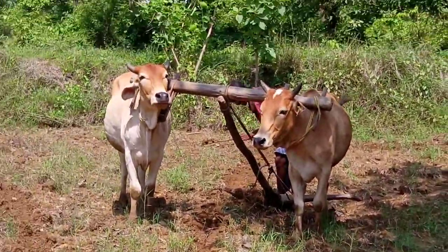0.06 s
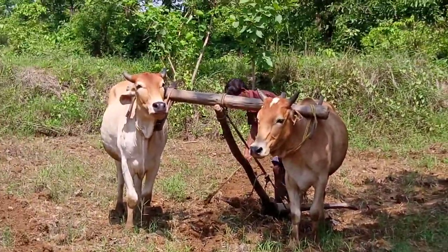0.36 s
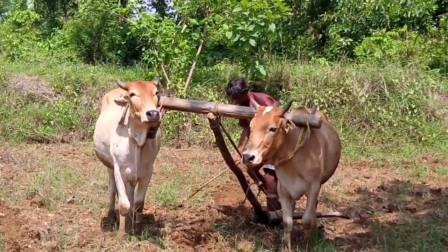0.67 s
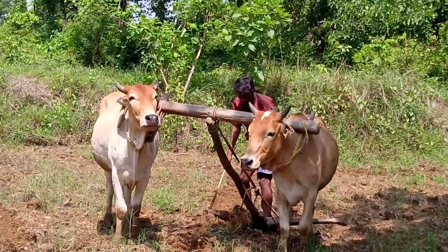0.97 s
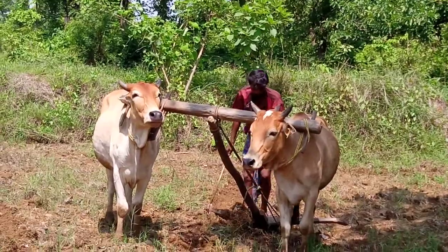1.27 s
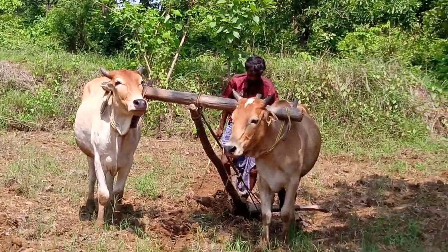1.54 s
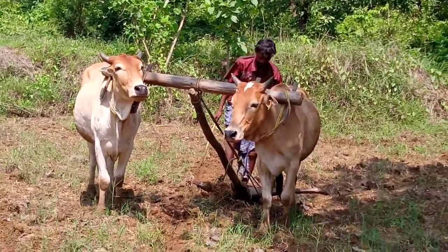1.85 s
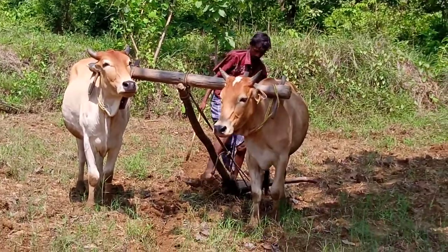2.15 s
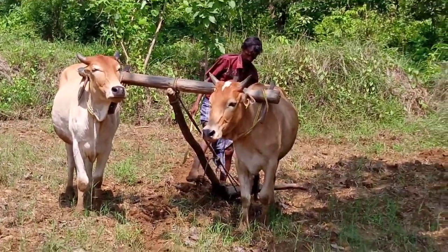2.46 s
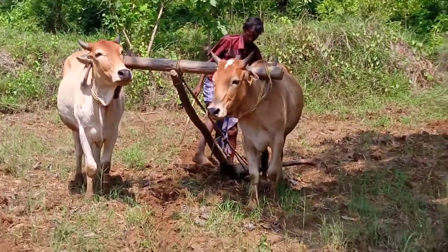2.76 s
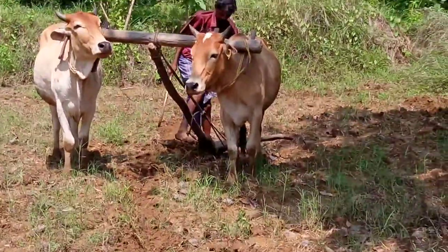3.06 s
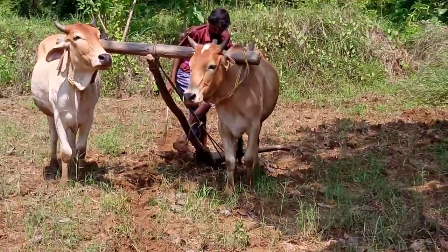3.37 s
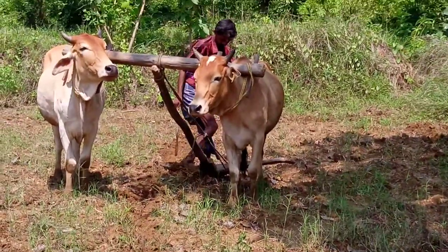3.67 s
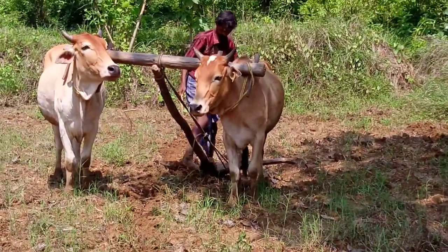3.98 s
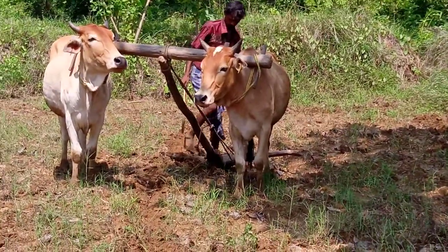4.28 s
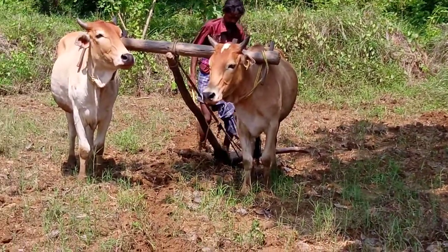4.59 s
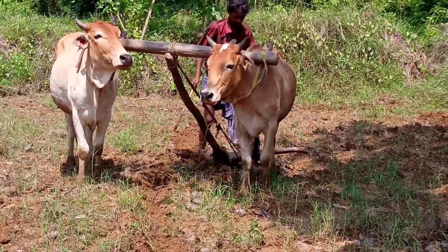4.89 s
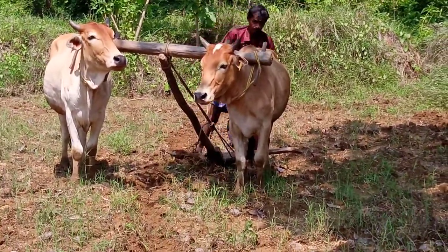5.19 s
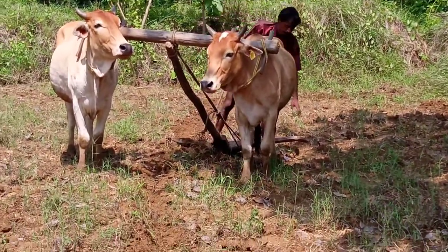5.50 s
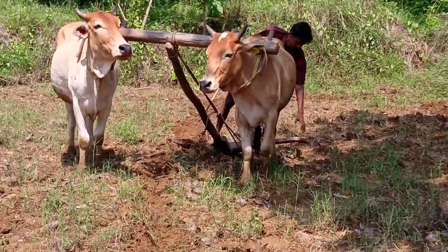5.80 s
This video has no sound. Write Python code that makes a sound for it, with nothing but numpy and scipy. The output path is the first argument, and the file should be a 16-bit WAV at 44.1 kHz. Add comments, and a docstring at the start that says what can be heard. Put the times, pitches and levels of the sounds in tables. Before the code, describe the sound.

A wooden stick cracks sharply once in an open field. Soft hoof thuds on loose soil and light knocks from a wooden plough follow, over a high insect drone and a steadily chirping cricket that grow louder. A small bird gives high calls in pairs. Near the end the stick cracks twice more, followed by dull thuds. Light wind rumbles on the microphone in puffs.

```python
"""A dry field, where two oxen stand at a wooden plough while a stick cracks three times.
Each blow excites the damped modes of the wood; hooves, clods and the yoke add soft thuds and knocks.
Turbulent air rumbles on the microphone and a pump engine hums far away. Insects merge into a drone,
crickets chirp by stridulation, and a small bird calls in pairs of swept tones, with fainter birds beyond.
The bushes scatter the knocks, chirps and calls into short reverberation."""
import sys
import numpy as np
from scipy import signal
from scipy.fft import rfft, irfft
from scipy.io import wavfile
from scipy.ndimage import uniform_filter1d

SR = 44100
rng = np.random.default_rng(int(sys.argv[2]) if len(sys.argv) > 2 else 0)


def persist_wave(psi):
    """Save psi, clipped to +-1, as 16-bit WAV."""
    counts = np.round(np.clip(psi, -1, 1) * 32767).astype(np.int16)
    wavfile.write(sys.argv[1], SR, np.atleast_2d(counts).T)


N = 266364
TIME = np.arange(N) / SR


def amp(db):
    """Amplitude ratio of a level in decibels."""
    return 10 ** (np.asarray(db) / 20)


def unit(x):
    """Normalisation to an rms of one."""
    return x / np.sqrt(np.mean(x ** 2) + 1e-20)


def at_frequency(points, hz):
    """Interpolation of a table on a log-frequency axis."""
    f, value = np.transpose(points)
    return np.interp(np.log(hz + 1), np.log(f + 1), value)


def at_time(points, s=TIME):
    """Linear interpolation of a table in time."""
    return np.interp(s, *np.transpose(points))


def add(mix, s, sound):
    """Superposition of a sound on the mix, from time s."""
    start = round(s * SR)
    part = mix[max(start, 0):][:len(sound) + min(start, 0)]
    part += sound[max(-start, 0):][:len(part)]


def fade(t, t60):
    """Exponential decay, by 60 dB in t60 seconds."""
    return np.exp(-np.log(1000) * t / t60)


def ring(t, hz, t60):
    """Free vibration of one damped mode."""
    return np.sin(2 * np.pi * hz * t) * fade(t, t60)


def noise(spectrum, size=N):
    """Spectral shaping of white noise, at unit rms."""
    gain = amp(at_frequency(spectrum, np.fft.rfftfreq(size, 1 / SR)))
    return unit(irfft(rfft(rng.standard_normal(size)) * gain, size))


def wander(hz):
    """Random fluctuation of unit rms, band-limited to about hz."""
    gain = np.exp(-(np.fft.rfftfreq(N, 1 / SR) / hz) ** 2)
    return unit(irfft(rfft(rng.standard_normal(N)) * gain, N))


# Spectrum of the open air: (frequency [Hz], level [dB])
AIR_SPECTRUM = [(20, -18), (70, 17), (160, -2.5), (300, -1), (500, 0.5), (1000, -3), (2000, -4.5),
                (3300, -4), (4400, -9.5), (8000, -19.5), (10000, -19), (15500, -19)]

def open_air():
    """Ambient noise: a broadband floor whose level drifts slightly."""
    return amp(-66 + .5 * wander(3.5)) * noise(AIR_SPECTRUM)


# Engine harmonics: (order [1], rms level [dB])
PUMP_ORDERS = [(2, -62), (3, -65.5), (4, -67), (5, -79)]

def pump(fundamental_hz=38.38):
    """Harmonic series: only the low firing orders of a far engine carry across the fields."""
    cycles = np.cumsum(fundamental_hz * (1 + 0.0054 * wander(4.6))) / SR
    out = np.zeros(N)
    for order, db in PUMP_ORDERS:
        peak = np.sqrt(2) * amp(db + 1.6 * wander(7))
        out += peak * np.sin(2 * np.pi * (order * cycles + rng.random()))
    return out


# Deep and upper bands of the wind rumble: (frequency [Hz], level [dB])
DEEP_SPECTRUM = [(20, -43), (40, -14), (65, -2), (100, 2.5), (150, -2), (200, -13), (280, -29), (500, -62),
                 (2000, -100)]
UPPER_SPECTRUM = [(100, -29), (200, 8), (300, 4), (450, -15), (800, -25.5), (1600, -35), (5000, -85)]
# Puffs of air: (peak time [s], level [dB], length [s], relative level of upper band [dB])
AIR_PUFFS = [(0.027, -51, 0.043, -18), (0.283, -49, .07, -28), (0.625, -50.5, 0.056, -18),
             (0.694, -54, 0.11, -28), (0.92, -49, 0.11, -20), (1.06, -49, 0.18, -11.5),
             (1.246, -46, 0.061, -18), (1.448, -47, 0.028, -28), (1.64, -47.5, 0.057, -33),
             (1.751, -47.5, 0.045, -35), (1.87, -42.5, 0.13, -22), (1.998, -50, .04, -22),
             (2.487, -54, 0.024, -24), (2.85, -31.5, 0.043, -11), (2.977, -49, 0.5, -16),
             (3.13, -36, .04, -6), (3.764, -48, 0.031, -5), (3.878, -44, .06, -10),
             (3.994, -48, 0.15, -14.5), (4.297, -52.5, 0.11, -18), (4.693, -48.5, 0.15, -23),
             (5.572, -46, 0.13, -21), (5.681, -37, 0.12, -13), (6.013, -39, 0.15, -3)]

def buffeting(breeze_db=-61, ceiling_db=-36, rise_share=0.48):
    """Turbulent pressure on the microphone: puffs and breeze add in power; the deep band saturates."""
    deep_power = amp(breeze_db + 3.5 * wander(13)) ** 2
    upper_power = deep_power * amp(-14) ** 2
    for s, db, length, upper_db in AIR_PUFFS:
        width = length * np.where(TIME < s, rise_share, 1 - rise_share)
        puff = amp(db) * np.exp(-((TIME - s) / width) ** 2)
        deep_power += puff ** 2
        upper_power += (amp(upper_db) * puff) ** 2
    deep = noise(DEEP_SPECTRUM)
    deep = unit(deep / np.sqrt(uniform_filter1d(deep ** 2, size=2400) + 1e-9))  # flatten its envelope
    upper = np.sqrt(upper_power) * amp(-2 + 3.6 * wander(31)) * noise(UPPER_SPECTRUM)
    return amp(-0.5) * np.minimum(np.sqrt(deep_power), amp(ceiling_db)) * deep + upper


# Spectrum of the insect chorus: (frequency [Hz], level [dB])
CHORUS_SPECTRUM = [(4400, -33), (4750, -25), (5100, -12.5), (5500, -10), (6100, -13), (6550, -4), (6900, 0),
                   (7250, -3.5), (7600, -11), (8200, -25), (8700, -18), (8950, -23.5), (9250, -48),
                   (11000, -47)]
# Its slow swell: (time [s], level [dB])
CHORUS_LEVEL = [(0, -57.5), (2.5, -57.5), (4, -54.5), (6.04, -52)]

def insect_chorus():
    """Incoherent summation: countless far insects merge into a shimmering band of noise."""
    return amp(at_time(CHORUS_LEVEL) + 0.65 * wander(70) + 0.43 * wander(0.5)) * noise(CHORUS_SPECTRUM)


def far_whistle(start_s=2.94, length_s=1.32, ramp_s=0.055, sag_hz_per_s=37):
    """Frequency glide: a distant bird's pure tone sinks quickly, then sags slowly."""
    t = np.maximum(TIME - start_s, 0)
    hz = 1783 - sag_hz_per_s * t + 190 * np.exp(-t / .09) + 7 * wander(30)
    envelope = np.clip(np.minimum(t, length_s - t) / ramp_s, 0, 1)
    return envelope * amp(-75.5 + 1.9 * wander(9.4)) * np.sin(2 * np.pi * np.cumsum(hz) / SR)


# Reverberation time of the bushes: (frequency [Hz], t60 [s])
BUSH_DECAY = [(300, 0.25), (800, 0.2), (2000, 1), (4000, 0.69), (7000, 0.56), (14000, 0.25)]

def scatter(x, near_t60, far_db, onset_s):
    """Scattering off leaves and bank: convolution with a quick near cluster and a longer far tail."""
    t = TIME[:SR * 3 // 4]
    near, far = rng.standard_normal((2, len(t)))
    hz, frames, bands = signal.stft(far, SR, nperseg=256)
    bands *= fade(frames, at_frequency(BUSH_DECAY, hz)[:, None])
    far = signal.istft(bands, SR, nperseg=256)[1][:len(t)]
    response = (near * fade(t, near_t60) + amp(far_db) * far) * (1 - np.exp(-(t / onset_s) ** 2))
    return signal.fftconvolve(x, response / np.linalg.norm(response))[:N]


# Faint bird notes: (time [s], level [dB], starting pitch [Hz], final pitch [Hz], length [s])
TWITTER_NOTES = [(5.665, -50, 5550, 5070, 0.026), (5.754, -56, 4800, 3820, 0.039),
                 (5.863, -65, 5500, 4960, 0.025), (5.942, -56, 4800, 4500, .025),
                 (6.001, -58, 4700, 3880, 0.04)]

def twitters():
    """Diffuse field: falling notes from deep in the bushes arrive mostly as scattered sound."""
    out = np.zeros(N)
    for s, db, start_hz, end_hz, length in TWITTER_NOTES:
        progress = np.arange(0, 1, 1 / (length * SR))
        hz = end_hz + (start_hz - end_hz) * (1 - progress) ** 2
        envelope = amp(db) * np.sin(np.pi * progress) ** .5
        add(out, s, envelope * np.sin(2 * np.pi * np.cumsum(hz) / SR))
    return amp(-14) * out + amp(-4.5) * scatter(out, near_t60=.1, far_db=-9, onset_s=.002)


# Chirps of the nearest cricket: (time of first stroke [s])
CHIRP_TIMES = [0.008, 0.458, 0.867, 1.306, 1.762, 2.206, 2.652, 3.073, 3.556, 3.993, 4.462, 4.915, 5.381,
               5.773]
# Its rising level: (time [s], level [dB])
CRICKET_LEVEL = [(0, -47), (2.6, -47.5), (3.8, -41), (6.04, -39)]
# One chirp of a lower cricket: (time [s], level [dB], starting pitch [Hz])
NEIGHBOUR_CHIRP = (3.1, -46, 6500)

def crickets(nearest_hz=7310, drop_hz=650, stroke_s=.016, period_s=.0285):
    """Stridulation: three wing strokes a chirp, each falling in pitch; others sound faintly at random."""
    out, others = np.zeros(N), np.zeros(N)
    progress = np.arange(0, 1, 1 / (stroke_s * SR))
    chirps = [(s, at_time(CRICKET_LEVEL, s), nearest_hz) for s in CHIRP_TIMES]
    for s, db, top_hz in chirps + [NEIGHBOUR_CHIRP]:
        phase = 2 * np.pi * np.cumsum(top_hz - drop_hz * progress) / SR
        pulse = np.sin(np.pi * progress) * (np.sin(phase) + amp(-42) * np.sin(2 * phase))
        for k, stroke_db in enumerate([-2.5, 0.3, -0.3]):
            add(out, s + k * period_s - stroke_s / 2, amp(db + stroke_db) * pulse)
        for when, strength in rng.random((5, 2)):
            add(others, when * N / SR, amp(-49.5) * strength * pulse)
    return out + others + amp(-7) * scatter(out, near_t60=0.049, far_db=-5, onset_s=0.0021)


# Loudness of the call at each pitch, fainter at the very top: (frequency [Hz], gain [dB])
CALL_LEVEL_BY_PITCH = [(3500, 13), (4900, -4), (6000, 2.5), (7500, 3), (8000, -18.5), (8600, -15)]
# Calls: (time of top [s], level [dB], top pitch [Hz], final pitch [Hz], time stretch [1], echo gain [dB])
BIRD_CALLS = [(0.988, -40, 8420, 4890, 1.05, 1.5), (1.221, -45, 7660, 4780, 1.16, 3),
              (3.15, -29.5, 7070, 4940, 1.18, -10.5), (3.403, -34.5, 7256, 4756, 1, -4),
              (5.048, -27.5, 7530, 5000, 1.1, -6.5), (5.283, -28, 7670, 4780, 1.33, -10)]

def bird():
    """Frequency modulation: a fluttering near-sine climbs, holds and falls; leaf echoes interfere."""
    direct, to_bushes = np.zeros(N), np.zeros(N)
    lead, climb, hold, fall, end, release = .043, .03, .0081, .0145, .074, .013  # [s] before stretching
    first = -lead - hold / 2
    for s, db, top_hz, end_hz, stretch, echo_db in BIRD_CALLS:
        t = np.arange(first, end, 1 / (SR * stretch))
        before, after = np.maximum(-t - hold / 2, 0), np.maximum(t - hold / 2, 0)
        sunk = 1 - np.exp(-after / fall)
        contour_db = -37.5 * before / lead - 15 * sunk  # swells to the top, softens as it sinks
        ending = np.minimum((end - t) / release, 1)
        quiver_hz, flutter_db = 70 * wander(300)[:len(t)], 3 * wander(170)[:len(t)]
        hz = top_hz - (top_hz - end_hz) * uniform_filter1d(before / climb + sunk, size=160)
        phase = 2 * np.pi * np.cumsum(hz + quiver_hz * (hz / top_hz) ** 2) / SR
        tone = np.sin(phase) + amp(-40) * np.sin(2 * phase)
        call = amp(db + contour_db + at_frequency(CALL_LEVEL_BY_PITCH, hz) + flutter_db) * ending * tone
        start = s + first * stretch
        add(direct, start, call)
        for delay in rng.uniform(.001, .007, 3):  # early reflections
            add(direct, start + delay, .35 * call)
        add(to_bushes, start, amp(echo_db) * call)
    return amp(-5.5) * direct + scatter(to_bushes, near_t60=0.23, far_db=-2, onset_s=0.0013)


# Stirring of the stubble: (time [s], level [dB])
RUSTLE_LEVEL = [(0, -83), (1.14, -76), (1.6, -90), (2.7, -87), (3.0, -76.5), (4.05, -73), (4.4, -86),
                (5.2, -70), (6.04, -78)]
# Spectrum of dry stalks: (frequency [Hz], level [dB])
STUBBLE_SPECTRUM = [(2000, -10), (5000, -20), (9000, 11), (11000, 5), (13000, -5), (15500, -18)]

def rustle():
    """Friction noise: stalks stirred by hooves and rope brush against each other."""
    return amp(at_time(RUSTLE_LEVEL) - 3) * noise(STUBBLE_SPECTRUM)


def twig():
    """Brittle fracture: a dry stalk gives way with one bright tick."""
    out = np.zeros(N)
    add(out, s=3.1884, sound=amp(-12.5) * ring(TIME[:512], hz=12700, t60=0.00023))
    return out


# Dull impacts on the soil: (time [s], level [dB], pitch [Hz], swell time [s])
SOIL_THUDS = [(0.599, -45, 110.6, 0.013), (1.724, -41, 103, 0.0065), (1.86, -49, 187, 0.011),
              (2.812, -26, 106.4, 0.013), (3.004, -34.5, 95, 0.0068), (3.106, -38.5, 228, 0.0054),
              (3.121, -26, 116, 0.0078), (3.759, -38, 151, 0.0031), (3.852, -42, 198, 0.0025),
              (4.675, -39.5, 166, 0.0033), (4.791, -38, 120, 0.0049), (5.611, -29, 104, 0.006),
              (5.653, -25, 86.5, 0.013), (5.706, -38, 212, 0.01), (5.931, -31, 166, 0.0037),
              (5.981, -22, 150, 0.0046)]

def thuds():
    """Heavily damped impact: soft weight on loose soil gives a few low cycles that swell and die."""
    out, t = np.zeros(N), TIME[:8192]
    for s, db, hz, swell in SOIL_THUDS:
        envelope = t / swell * np.exp(1 - t / swell)
        partials = np.sin(2 * np.pi * hz * t) + 0.36 * np.sin(2 * np.pi * 1.81 * hz * t)
        add(out, s, amp(db - 3.5) * envelope * partials)
    return out


# Spectra of the contact click and the grit: (frequency [Hz], level [dB])
CLICK_SPECTRUM = [(200, 3), (900, 4), (1800, -2.5), (3500, -2.5), (5000, -14), (9000, -35), (15500, -29)]
GRIT_SPECTRUM = [(1500, -17), (5000, 3.5), (8000, 11.5), (10000, -2.5), (15500, -3)]
# Knocks of yoke, rope and clods: (time [s], body level [dB], body pitch [Hz], body t60 [s],
# click level [dB], click t60 [s], grit level [dB], grit t60 [s])
KNOCK_EVENTS = [(0.17, -73, 500, .02, -57.5, 0.047, -60, 0.064),
                (0.8160, -35.5, 627, 0.041, -44, 0.038, -45, 0.019),
                (2.279, -74, 500, .02, -60, 0.027, -60, .04),
                (2.865, -35.5, 650, 0.012, -36.5, 0.01, -56, 0.26),
                (3.1887, -36.5, 306, 0.021, -36, 0.006, -30, 0.0033),
                (3.298, -46, 384, 0.012, -75, .01, -77, .01),
                (3.424, -34, 378, 0.0063, -51, 0.0082, -55.5, 0.19),
                (3.682, -29, 515, 0.004, -52, 0.0067, -80, .01),
                (3.727, -60, 305, .02, -75, .02, -55.5, 0.06),
                (4.094, -67, 405, .02, -73, .02, -43.5, 0.053)]

def knocks():
    """Impact excitation: a damped wooden mode sounds with a dry click and a trickle of grit."""
    out, t = np.zeros(N), TIME[:8192]
    for s, db, hz, t60, click_db, click_t60, grit_db, grit_t60 in KNOCK_EVENTS:
        click = amp(click_db) * noise(CLICK_SPECTRUM, len(t)) * fade(t, click_t60)
        grains = rng.exponential(1, len(t)) ** 4  # sparse spikes
        trickle = unit(uniform_filter1d(grains, size=40) ** .5)
        grit = amp(grit_db) * noise(GRIT_SPECTRUM, len(t)) * fade(t, grit_t60) * trickle
        add(out, s, amp(db) * ring(t, hz, t60) + click + grit)
    return out + amp(-8) * scatter(out, near_t60=0.053, far_db=-12, onset_s=0.0029)


# Spectrum of a blow's echo: (frequency [Hz], level [dB])
ECHO_SPECTRUM = [(150, -1), (400, -1.5), (1000, 1), (2000, 1.5), (3600, 1.5), (4600, -9), (7000, -5.5),
                 (9000, -19), (15500, -39)]

def blow_echo(blow, near_t60=0.14, far_t60=0.7, onset_s=0.016):
    """Diffuse reflection: the near bank and leaves answer at once; far trees return the midrange."""
    t = TIME[:len(blow)]
    midrange = signal.butter(1, [900, 4000], "band", fs=SR, output="sos")
    near = noise(ECHO_SPECTRUM, len(t)) * fade(t, near_t60)
    far = signal.sosfilt(midrange, noise(ECHO_SPECTRUM, len(t))) * fade(t, far_t60)
    near *= amp(2.5 * wander(140)[:len(t)])  # uneven decay
    for delay, strength in zip(rng.uniform(.012, .05, size=6), rng.uniform(-1, 1, size=6)):
        add(near, delay, amp(-4) * strength * fade(delay, near_t60) * blow)
    return (near + amp(-13) * far) * (1 - np.exp(-(t / onset_s) ** 2))


# Modes of the stick: (frequency [Hz], level [dB], t60 [s])
STICK_MODES = [(373, -2.5, 0.098), (671, 8, 0.016), (810, 6, 0.039), (1054, 9, 0.031), (1520, -26, .025),
               (1830, 2.5, 0.05)]
# Spectrum of the splintery burst: (frequency [Hz], level [dB])
BURST_SPECTRUM = [(150, -24), (350, -2), (600, 3.5), (950, -4), (2000, 0), (3000, 1.5), (3600, -2.5),
                  (4600, -6.5), (5800, -19), (7200, -4.5), (9000, -18.5), (15500, -33)]
# Blows: (time [s], level [dB], snap pitch [Hz], snap t60 [s], burst gain [dB], burst t60 [s],
# mode gain [dB], mode tuning [1], overtone pitch [Hz], overtone gain [dB], echo gain [dB])
STICK_BLOWS = [(0.452, -18, 3600, 0.0037, -8, 0.028, -16.5, 1.5, 2116, -14.5, -20.5),
               (5.1816, -22.5, 2960, 0.0073, -4, 0.013, -6.5, 0.99, 1930, -16, -13),
               (5.5278, -25.5, 1800, 0.017, -3.5, 0.026, -4, 0.99, 2450, -4, -6)]

def stick():
    """Impulsive excitation: each blow is a snap, a splintery burst, ringing wooden modes and an echo."""
    out, t = np.zeros(N), TIME[:32768]
    for (s, db, snap_hz, snap_t60, burst_db, burst_t60,
         wood_db, tuning, overtone_hz, overtone_db, echo_db) in STICK_BLOWS:
        snap = -ring(t, snap_hz, snap_t60)
        add(snap, .00145, .5 * snap)  # ground reflection
        burst = amp(burst_db) * noise(BURST_SPECTRUM, len(t)) * fade(t, burst_t60)
        wood = amp(overtone_db) * ring(t, overtone_hz, t60=0.021)
        for mode_hz, mode_db, t60 in STICK_MODES:
            mode = amp(wood_db + mode_db - 9.5) * ring(t, mode_hz * tuning, t60)
            add(wood, rng.uniform(0, 0.001975), mode)
        burst *= 1 - np.exp(-t / 0.00089)  # finite rise times
        wood *= 1 - np.exp(-t / 0.00038)
        blow = snap + burst + wood
        add(out, s, amp(db) * (blow + amp(echo_db) * blow_echo(blow)))
    return out


def scene():
    """Linear superposition: all sources sum at one point, the same in both channels."""
    air = open_air()
    work = stick() + knocks() + twig() + thuds() + rustle()
    wildlife = bird() + twitters() + far_whistle() + crickets() + insect_chorus()
    mono = air + work + wildlife + buffeting() + pump()
    return np.array([mono, mono])


def record(dry, cutoff_hz=15850):
    """Band limiting: a linear-phase low-pass filter removes the highest treble."""
    lowpass = signal.firwin(511, cutoff_hz, window=("kaiser", 9), fs=SR)
    return signal.oaconvolve(dry, lowpass[None], "same")


dry = scene()
out = record(dry)
persist_wave(out)
```